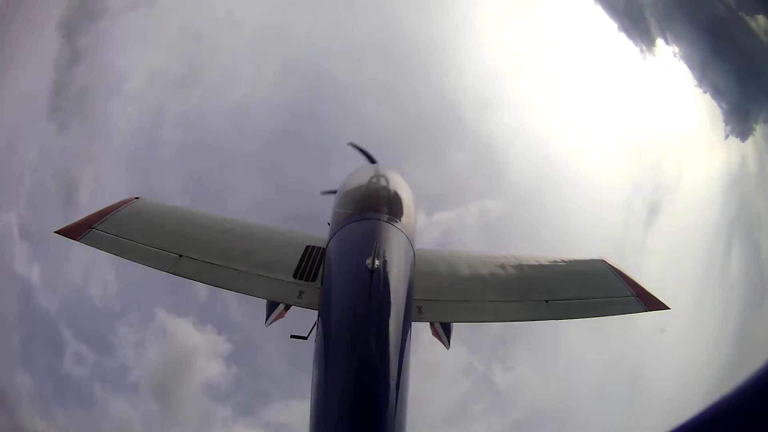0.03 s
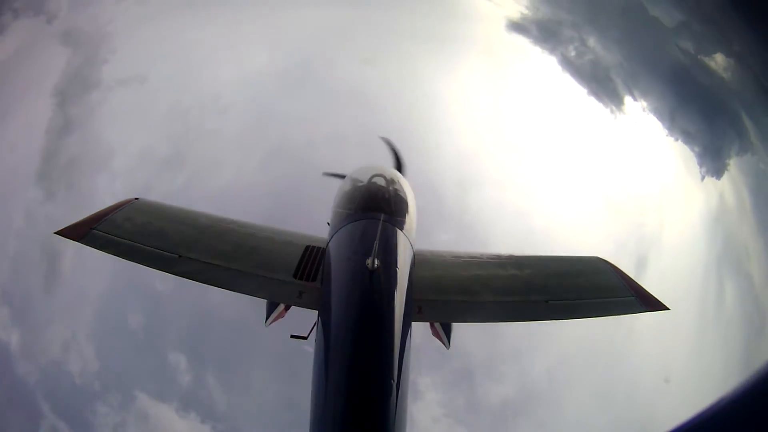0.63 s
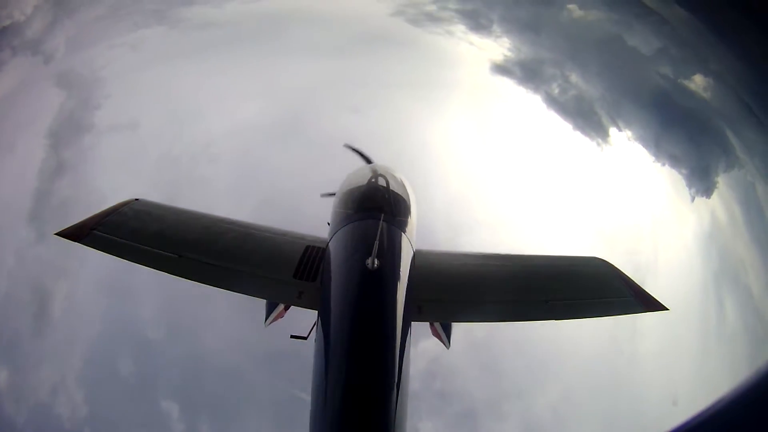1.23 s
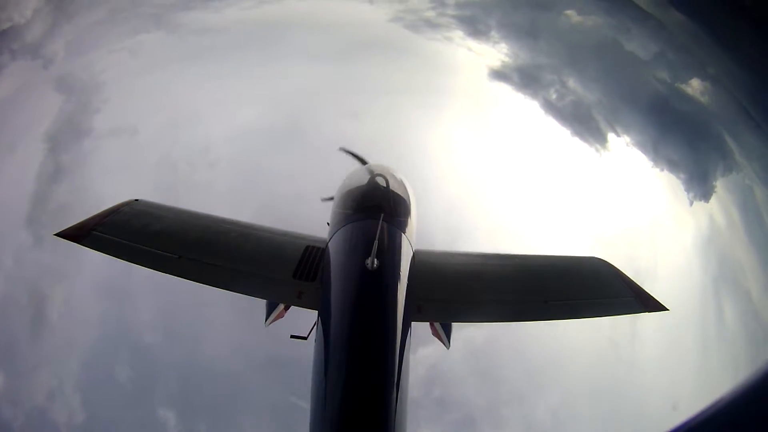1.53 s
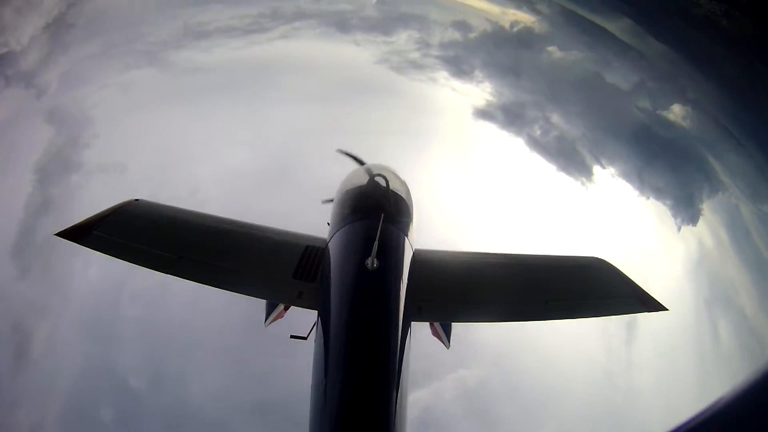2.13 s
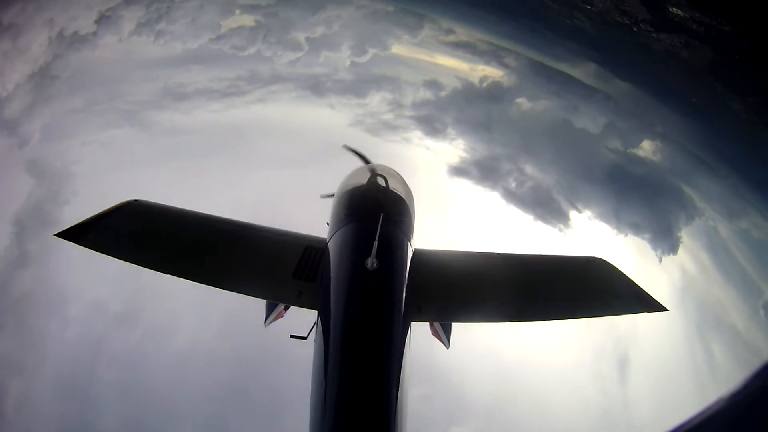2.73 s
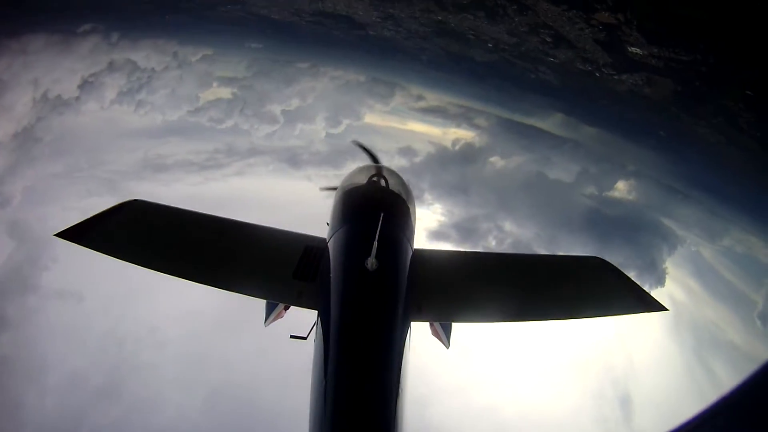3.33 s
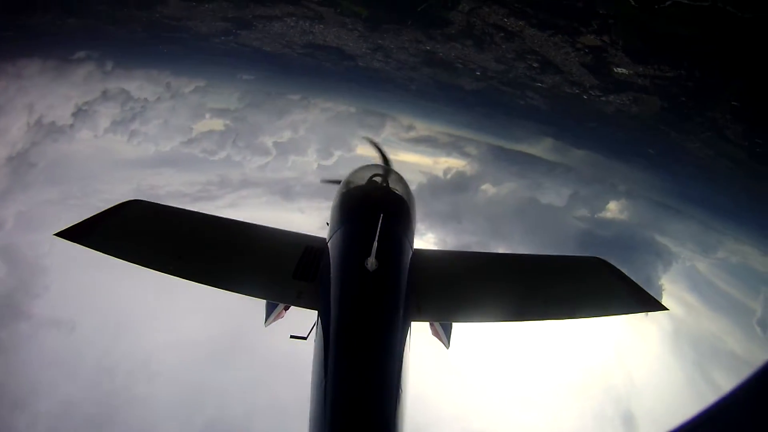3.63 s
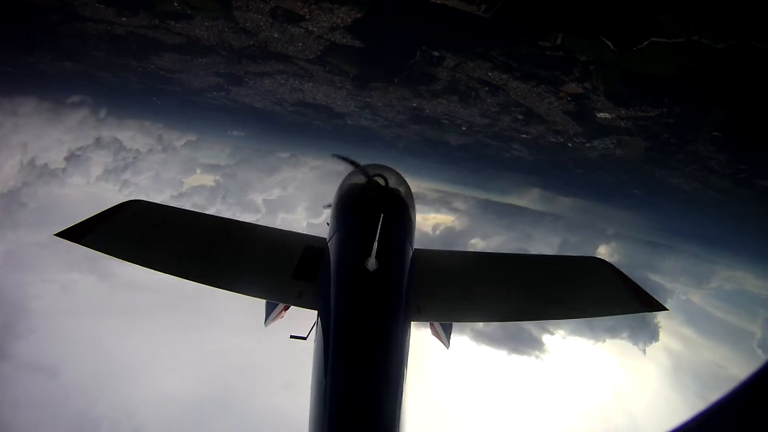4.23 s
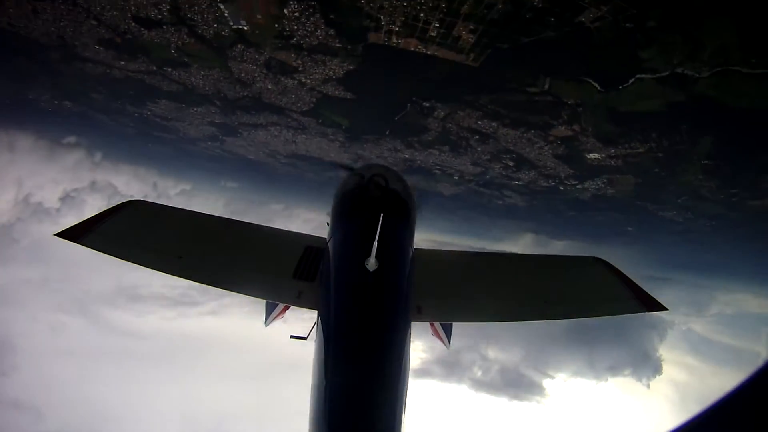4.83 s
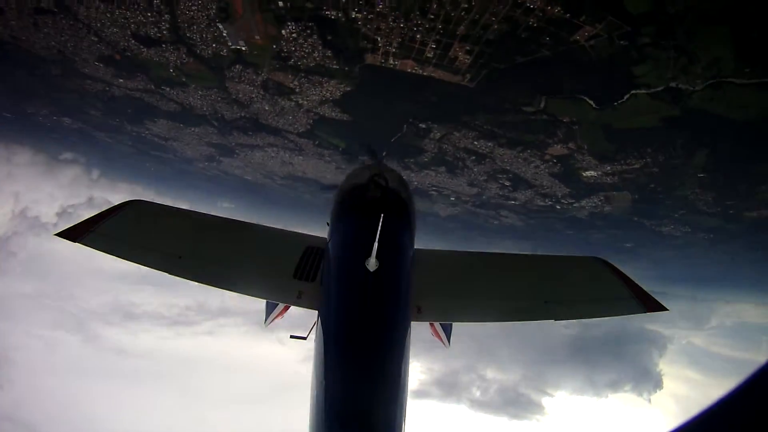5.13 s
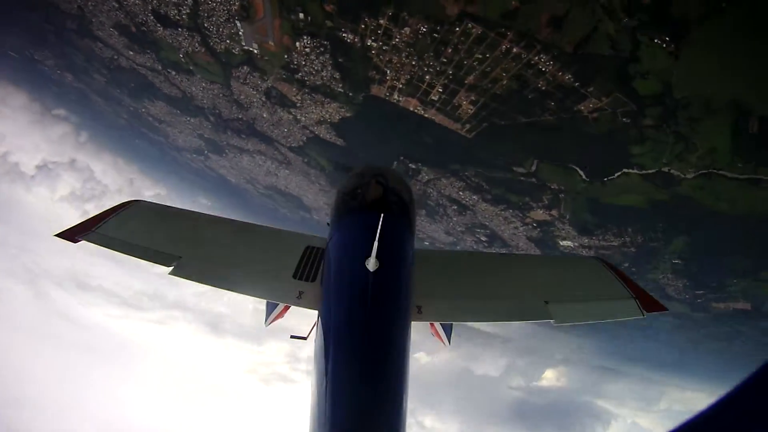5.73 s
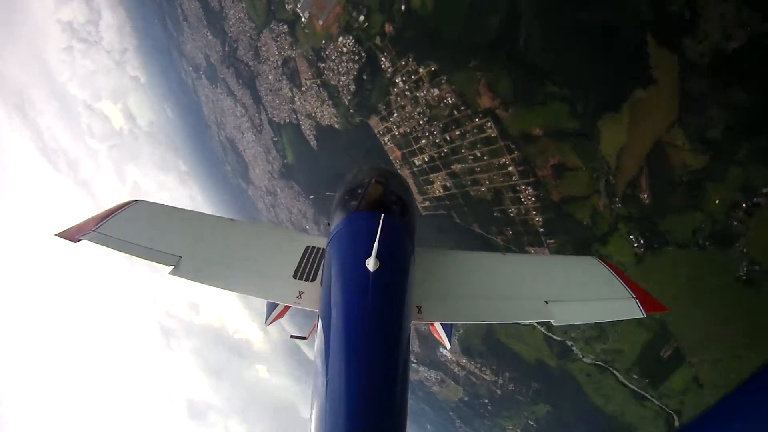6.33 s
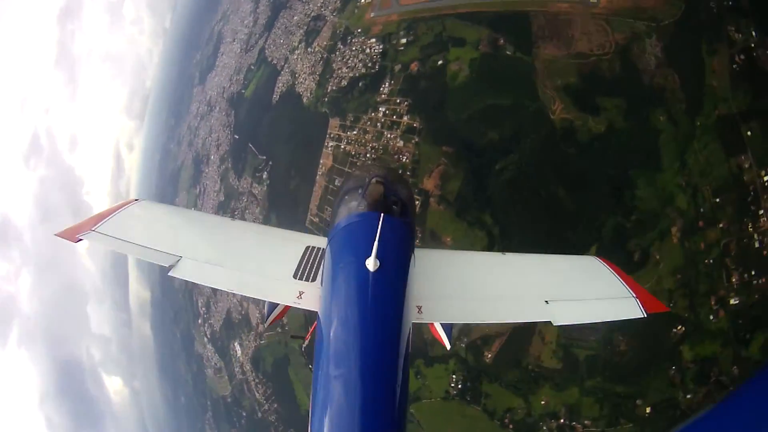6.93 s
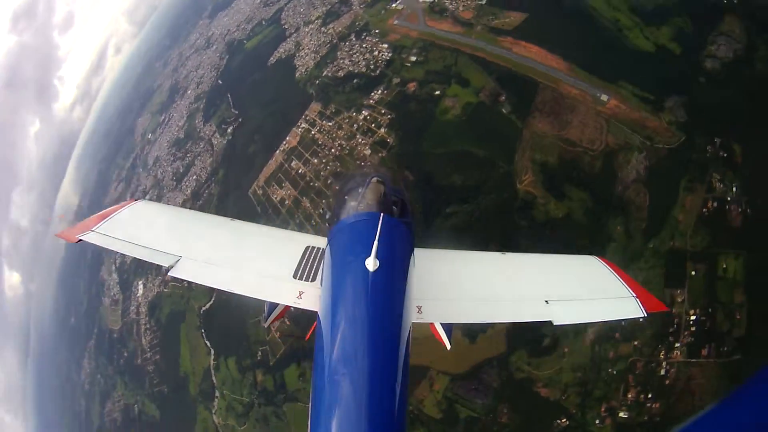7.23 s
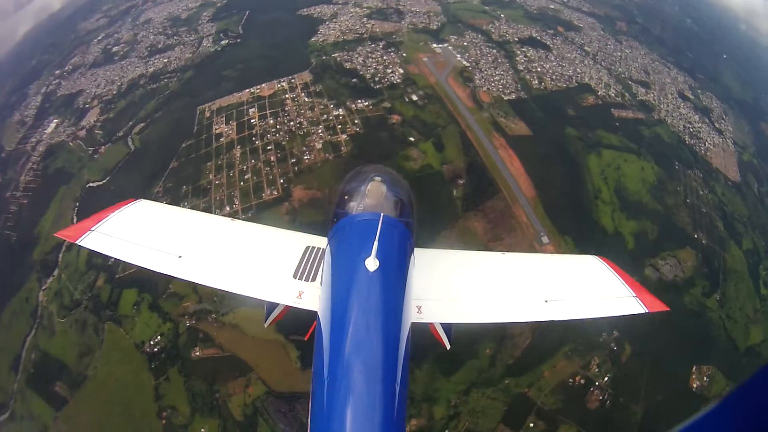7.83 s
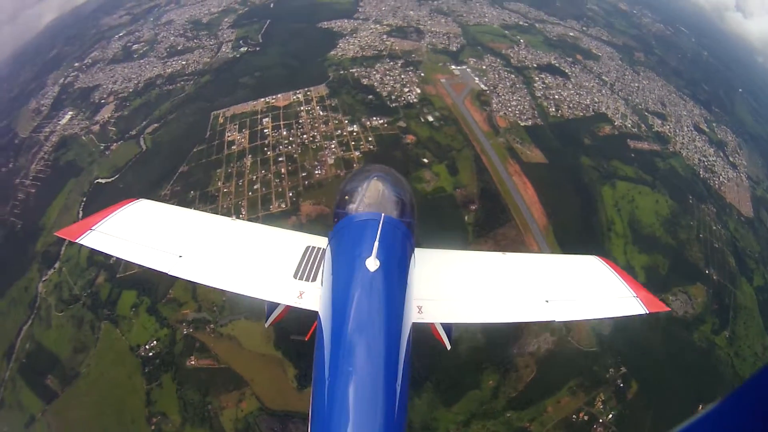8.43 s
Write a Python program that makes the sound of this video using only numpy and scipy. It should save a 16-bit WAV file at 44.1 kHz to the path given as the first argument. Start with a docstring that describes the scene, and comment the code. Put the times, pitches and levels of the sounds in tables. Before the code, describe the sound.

A small propeller plane's engine drones under buffeting wind that eases, then builds back to a loud roar.

```python
"""On the tail of a small piston plane, as it goes over the top of a loop and dives.
The engine drones on the orders of its shaft. The slipstream buffets the microphone's housing and roars
in the cavity of its port, pulsed by the propeller. Gusts slap as the flow breaks away, a gap whistles at
low airspeed, a shrill tone swells late in the dive, and the loudest peaks overload the microphone."""
import sys
import numpy as np
from scipy import signal
from scipy.fft import rfft, irfft, next_fast_len
from scipy.io import wavfile
from scipy.ndimage import uniform_filter1d, map_coordinates

SR = 44100
rng = np.random.default_rng(int(sys.argv[2]) if len(sys.argv) > 2 else 0)


def master_out(mix):
    """Clip the mix to full scale and print it as 16-bit PCM to the path in sys.argv[1]."""
    frames = np.transpose(np.atleast_2d(mix))
    ceiling = np.clip(frames, -1, 1)
    pcm = np.round(ceiling * 32767).astype(np.int16)
    wavfile.write(sys.argv[1], SR, pcm)


N = 383229
TIME = np.arange(N) / SR


def amp(db):
    """Decibels to gain."""
    return 10 ** (np.asarray(db) / 20)


def unit(x):
    """Scale to rms 1."""
    return x / np.sqrt(np.mean(x ** 2) + 1e-20)


def curves(rows):
    """One automation curve for each column after the time."""
    times, *columns = np.transpose(rows)
    return [np.interp(TIME, times, column) for column in columns]


def wobble(rate):
    """A smooth random curve, rate knots a second."""
    return map_coordinates(rng.standard_normal(int(N * rate / SR) + 4), [TIME * rate])


def filtered(x, response):
    """Shape x with a gain that depends on frequency."""
    size = next_fast_len(N + SR // 2)
    return irfft(rfft(x, size) * response(np.fft.rfftfreq(size, 1 / SR)), size)[:N]


def rush(spectrum):
    """Noise of rms 1, coloured by (frequency [Hz], level [dB]) points on a log axis."""
    points_hz, db = np.transpose(spectrum)
    colour = lambda hz: amp(np.interp(np.log(hz + 1), np.log(points_hz), db, left=-120, right=-120))
    return unit(filtered(rng.standard_normal(N), colour))


def swept_lowpass(x, cutoff_hz):
    """A steep low-pass whose cutoff moves with time."""
    hz, times, frames = signal.stft(x, SR, nperseg=512)
    ratio = hz[:, None] / np.interp(times, TIME, cutoff_hz)
    return signal.istft(frames / np.sqrt(1 + ratio ** 14), SR, nperseg=512)[1][:N]


# Thin, bright colour of the sizzle: (frequency [Hz], relative level [dB])
SIZZLE_COLOUR = [(3000, -20), (7500, 5.5), (8600, 7), (9500, 2.5), (11500, -3.5), (12600, 0), (13500, -6),
                 (15700, -1)]

def sizzle(angle):
    """A faint treble sizzle that ticks unevenly."""
    ticks = unit(amp(2.9 * (wobble(450) + .5 * np.cos(2 * angle))))
    return amp(-55.3) * ticks * rush(SIZZLE_COLOUR)


def edge_tone(angle, hz, bend_hz=45, chop_db=3.5):
    """A fluttering whistle, bent and chopped by each turn of the propeller."""
    pitch = hz + bend_hz * np.cos(angle) + 65 * wobble(700)
    chop = unit(amp(chop_db * np.cos(angle) + 2.5 * wobble(150)))
    return chop * np.sin(2 * np.pi * np.cumsum(pitch) / SR)


def gap_whistle(angle, flow, best_flow=.4, width=.066):
    """A gap sings over a narrow range of slow flow, its pitch following the air."""
    level_db = -44.5 - (np.log(flow / best_flow) / width) ** 2
    pitch_hz = 8420 + 3800 * (flow - best_flow)
    return amp(level_db) * edge_tone(angle, pitch_hz)


def dive_whistle(angle, start_s=8.11, attack_s=.15, rise_db_per_s=40):
    """A shrill tone swells late in the dive."""
    age = np.maximum(TIME - start_s, 0)
    swell = np.minimum(age / attack_s, 1) * amp(-46 + rise_db_per_s * age)
    return swell * edge_tone(angle, hz=7970)


# Deep rumble at the port: (frequency [Hz], relative level [dB])
RUMBLE_COLOUR = [(6, -21), (18, 10), (40, -1), (65, 2.5), (110, -3), (170, -2), (400, -24.5)]
# Boxy thump of the housing: (frequency [Hz], relative level [dB])
THUMP_COLOUR = [(60, -27), (110, -5), (160, -1), (220, 5.5), (270, -4), (320, -8), (400, -14), (560, -22),
                (800, -39.5), (1300, -29.5), (3000, -73)]
# Fader ride of the thump: (time [s], level [dB])
THUMP_RIDE = [(0, -18), (.6, -15), (1, -18), (3.5, -16), (7.8, -20.5), (8.69, -18)]

def buffeting(flow):
    """Large eddies rumble at the port, harder in fast air, and thump the housing."""
    thump_db, = curves(THUMP_RIDE)
    rumble = amp(-18 - 5.5 * (1 - flow)) * rush(RUMBLE_COLOUR)
    thumps = unit(amp(1.1 * wobble(30)) * rush(THUMP_COLOUR))
    return rumble + amp(thump_db) * thumps


# Gusts hitting the port: (time [s], envelope peak [dB])
GUST_HITS = [(1.1, -7), (1.163, 4), (1.188, 2.5), (1.274, -8), (1.2825, 2), (1.299, -7), (1.308, -9),
             (1.335, -9), (1.36, 1)]
# Midrange crack of a gust: (frequency [Hz], relative level [dB])
GUST_COLOUR = [(200, -22), (600, -13), (1100, -9), (1800, 0), (2600, -10), (4500, -12), (6000, -21),
               (15700, -42)]

def gusts(half_length_s=.001):
    """Sharp gusts drive the cavity for a few milliseconds each as the flow breaks away."""
    bursts = sum(amp(db) * np.exp(-((TIME - s) / half_length_s) ** 2) for s, db in GUST_HITS)
    return bursts * rush(GUST_COLOUR)


# Hollow colour of the chuff: (frequency [Hz], relative level [dB])
CHUFF_COLOUR = [(200, -15), (500, -11), (1000, 0.5), (1300, 0), (2500, -28.5)]

def air_chuff(flow, turn_db):
    """Deep propeller pulses and fast air puff in the midrange."""
    return amp(2.5 * turn_db + 4.8 * flow - 50.5) * rush(CHUFF_COLOUR)


# Airy top of the slipstream: (frequency [Hz], relative level [dB])
HISS_COLOUR = [(3000, -14), (4600, 6), (5600, -0.5), (7000, -3.5), (8300, -7.5), (10000, -13),
               (12500, -17.5), (15700, -17.5)]

def air_hiss(flow, turn_db, blade_db, lift_hz):
    """Faster air hisses louder and higher into the treble; the propeller wash strengthens it."""
    level_db = -33.5 - 11.5 * (1 - flow) + 1.3 * turn_db + 2.64 * blade_db
    return amp(level_db) * swept_lowpass(rush(HISS_COLOUR), cutoff_hz=18400 * flow + lift_hz)


# Ring of the cavity in slow air: (frequency [Hz], relative level [dB])
SLOW_RING = [(300, -16), (800, -10), (1150, -14), (1400, -5), (1700, 2.5), (2000, -1.5), (2600, -9),
             (3100, -10.5), (3700, -9.5), (4100, -10), (4550, -8), (5200, -25.5), (6200, -36.5),
             (9000, -69)]
# Its sharper ring in fast air: (frequency [Hz], relative level [dB])
FAST_RING = [(200, -33), (550, -18.5), (850, -17), (1200, -12.5), (1500, -6.5), (1800, 1), (2200, -6),
             (2450, -8), (2650, -13.5), (3500, -12), (4100, -15), (4550, -14.5), (5400, -28.5), (9000, -56)]

def cavity_roar(flow, turn_db, howl_db=8, lock_flow=.904, lock_width=.068):
    """Small eddies ring the port's cavity, louder with flow and wash, and howling once it locks on."""
    locked = .5 + .5 * np.tanh((flow - lock_flow) / (2 * lock_width))
    level_db = -19 + 1.055 * 20 * np.log10(flow) + howl_db * locked + .86 * turn_db
    fast = np.clip((flow - .3) / .7, 0, 1)
    ring = np.sqrt(1 - fast) * rush(SLOW_RING) + np.sqrt(fast) * rush(FAST_RING)
    return amp(level_db) * ring


# Tremolo depth of the propeller wash: (time [s], once a turn [dB], once a blade [dB])
WASH_DEPTH = [(1, 1.5, 0.1), (1.3, 0.9, 1), (2.2, 0.5, 2.5), (2.9, 3, 0.7), (3.25, 5, .5), (3.45, 0.8, 2.3),
              (3.75, 0.3, 2.5), (4.3, -0.5, 1.1), (5.1, 0.5, -0.2), (6, 0.1, .7), (6.7, 0.3, 1.3),
              (7.4, 1.5, 0.36)]
# Soft puffs of air: (time [s], half length [s], roar boost [dB], hiss boost [dB], hiss cutoff lift [Hz])
AIR_PUFFS = [(3.78, 0.055, 1.5, 3, 200), (5.51, .055, 1.5, 2.5, 1900), (8.59, 0.052, 5.5, 7, 500)]

def slipstream(angle, flow, sputter_db=2.2):
    """Roar, hiss and chuff pulse in the propeller wash and sputter while the flow collapses."""
    puffs = sum(np.outer(boosts, np.exp(-((TIME - s) / half_s) ** 2)) for s, half_s, *boosts in AIR_PUFFS)
    roar_boost_db, hiss_boost_db, lift_hz = puffs
    turn_db, blade_db = curves(WASH_DEPTH)
    pulse = amp(turn_db * np.cos(angle) + blade_db * np.cos(2 * angle))
    wash = pulse / np.sqrt(uniform_filter1d(pulse ** 2, size=SR // 10))  # tremolo at even power
    collapse = np.clip(-np.gradient(flow) * SR, 0, 1)
    eddies = unit(amp(.3 * wobble(18) + (.55 + sputter_db * collapse) * wobble(220)))
    roar = amp(roar_boost_db) * cavity_roar(flow, turn_db)
    hiss = amp(hiss_boost_db) * air_hiss(flow, turn_db, blade_db, lift_hz)
    return wash * eddies * (roar + hiss + air_chuff(flow, turn_db))


def partial(angle, waver_db, drift):
    """A sine whose level and phase waver; drift is in radians."""
    return amp(waver_db * wobble(14)) * np.sin(angle + rng.uniform(0, 2 * np.pi) + drift * wobble(12))


# Firing note, the 2nd shaft order: (time [s], relative level [dB])
FIRING_RIDE = [(0.0, -17.5), (0.29, -16.5), (0.51, -28.5), (0.67, -14.5), (0.84, -24.5), (1.19, -12),
               (2.37, -11.5), (3.02, -21), (3.1, -11.5), (3.32, -11), (4.36, -15), (4.74, -9), (5.49, -18),
               (7.24, -16), (7.72, -32), (8.42, -9.5), (8.69, -17)]
# 3rd order, which takes over in the dive: (time [s], relative level [dB])
THIRD_RIDE = [(0.0, -28), (0.12, -27), (2.76, -35), (2.95, -22), (5.83, -26), (6.32, -11), (7.5, -14.5),
              (7.67, -28), (7.99, -11.5), (8.23, -25.5), (8.69, -12)]
# 4th order: (time [s], level [dB])
FOURTH_RIDE = [(0, -23), (.55, -16.5), (1.3, -28), (2.6, -23), (4.2, -31), (4.9, -19), (5.7, -31.5),
               (7.15, -24), (8.69, -35)]
# Top of the drone: (time [s], 5th order level [dB], 7th order level [dB])
UPPER_RIDE = [(0, -22, -25), (1.55, -21.5, -31), (1.95, -14.5, -20.5), (2.6, -23, -24.5), (3.5, -15, -18),
              (5.3, -17, -20.5), (5.8, -15, -22.5), (6.9, -11, -27), (7.2, -19, -31.5)]
# Growl partials, the halves from unequal cylinders: (shaft order, relative level [dB])
GROWL_ORDERS = [(.5, -43.5), (1, -31.5), (1.5, -31.5), (4.5, -34), (5.5, -29), (6, -27.5), (6.5, -35),
                (7.5, -36.5), (8.5, -39)]
# Fader ride of the growl: (time [s], gain [dB])
GROWL_RIDE = [(0, -13), (.6, -12), (1.3, 2), (2.6, 4), (3.4, -6.5), (4.2, -4), (4.9, 3), (5.7, -4),
              (8.69, -1)]
# High partials of the rasp: (shaft order, relative level [dB])
RASP_ORDERS = [(8, -30), (9, -37.5), (10, -37.5), (11, -42.5), (12, -40.5), (13, -40), (14, -41), (15, -44),
               (16, -46), (18, -46), (20, -55)]

def engine(angle, shaft_hz, rasp_knee_hz=41.56, rasp_db_per_hz=9):
    """Blades and firings beat twice a turn; uneven firing growls, and high revs bring up a rasp."""
    firing_db, = curves(FIRING_RIDE)
    third_db, = curves(THIRD_RIDE)
    fourth_db, = curves(FOURTH_RIDE)
    fifth_db, seventh_db = curves(UPPER_RIDE)
    growl_db, = curves(GROWL_RIDE)
    drone = amp(firing_db + 3.5) * partial(2 * angle, waver_db=1.06, drift=.076)
    drone += amp(third_db + 3.5) * partial(3 * angle, waver_db=-.16, drift=.12)
    drone += amp(fourth_db) * partial(4 * angle, waver_db=2.5, drift=.31)
    drone += amp(fifth_db) * partial(5 * angle, waver_db=2.5, drift=.22)
    drone += amp(seventh_db) * partial(7 * angle, waver_db=2.5, drift=.077)
    growl = sum(amp(db) * partial(order * angle, waver_db=2, drift=.57) for order, db in GROWL_ORDERS)
    rasp = sum(amp(db) * partial(order * angle, waver_db=3.5, drift=order / 19)
               for order, db in RASP_ORDERS)
    rasp_db = -8.5 + rasp_db_per_hz * np.maximum(shaft_hz - rasp_knee_hz, 0)
    return drone + amp(growl_db) * growl + amp(rasp_db) * rasp


# Engine revs: (time [s], shaft speed [turns/s])
REVS = [(0, 41.35), (0.75, 42.2), (1.25, 40.5), (1.65, 40.55), (2.5, 41.0), (2.9, 41.7), (3.7, 41.38),
        (4.5, 41.6), (5, 42.15), (5.6, 42.23), (6.1, 42.75), (6.7, 42.82), (7.3, 42.6), (8.69, 42.62)]
# Air at the port, slowest at the top of the loop: (time [s], speed [share of full flow])
AIRFLOW = [(0, 1.068), (1.16, 1.006), (1.31, 0.86), (1.44, 0.5), (2.1, 0.37), (2.9, 0.32), (3.5, 0.27),
           (4, 0.29), (4.8, .4), (5.4, 0.46), (6.3, 0.73), (6.9, 0.85), (7.17, 0.97), (7.7, 0.96),
           (8.2, 1.073)]

def scene():
    """Wind and engine in mono, driven by the speed of the shaft and the flow of air at the port."""
    shaft_hz, = curves(REVS)
    flow, = curves(AIRFLOW)
    angle = 2 * np.pi * np.cumsum(shaft_hz + .0498 * wobble(5)) / SR
    air = buffeting(flow) + slipstream(angle, flow)
    whistles = gap_whistle(angle, flow) + dive_whistle(angle)
    return (air + whistles + gusts() + sizzle(angle) + engine(angle, shaft_hz))[None]


def record(dry):
    """The microphone rounds the peaks and then hits its rail; nothing passes the band limit."""
    knee, hardness, rail, top_hz = .74, 9, .705, 15730
    rounded = dry[0] / (1 + np.abs(dry[0] / knee) ** hardness) ** (1 / hardness)
    return filtered(np.clip(rounded, -rail, rail), lambda hz: hz < top_hz)[None]


dry = scene()
out = record(dry)
master_out(out)
```